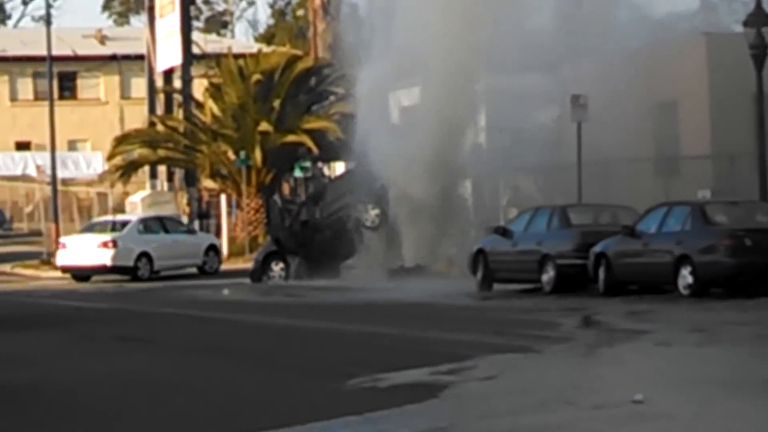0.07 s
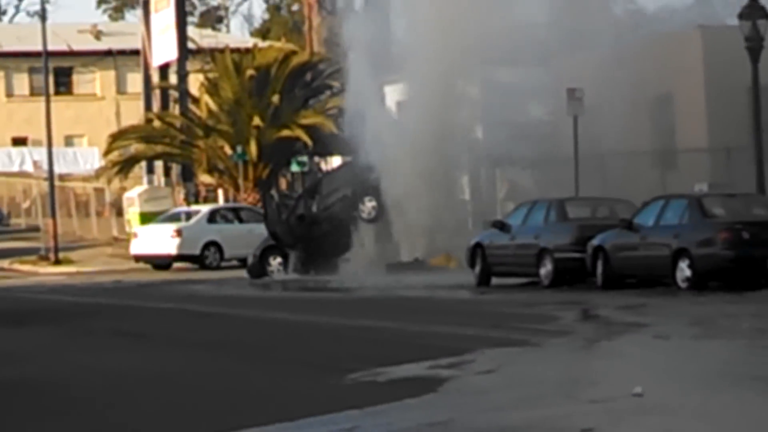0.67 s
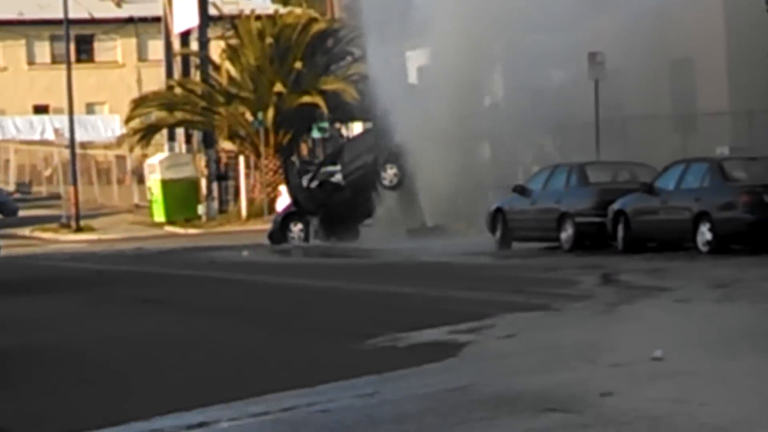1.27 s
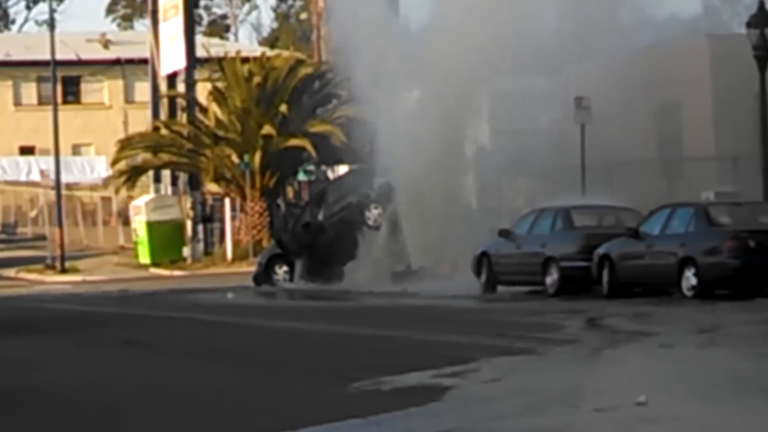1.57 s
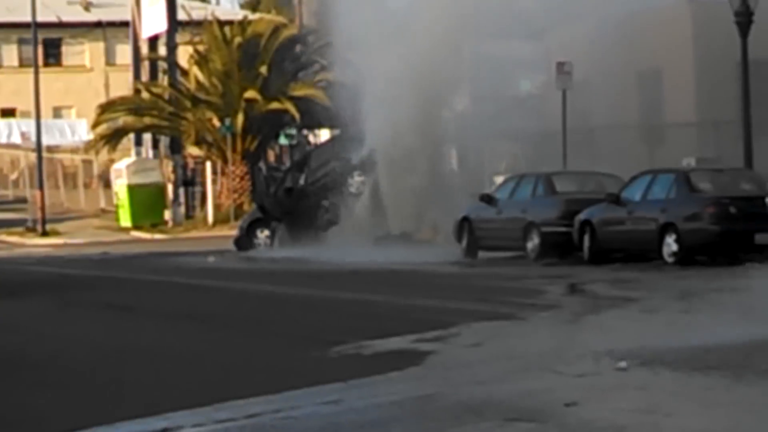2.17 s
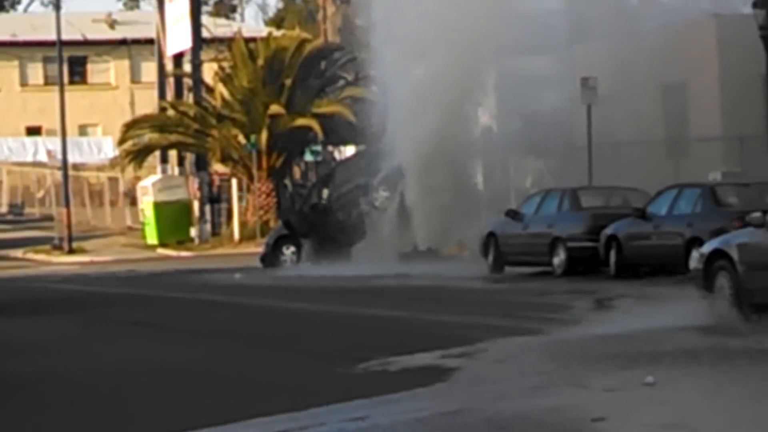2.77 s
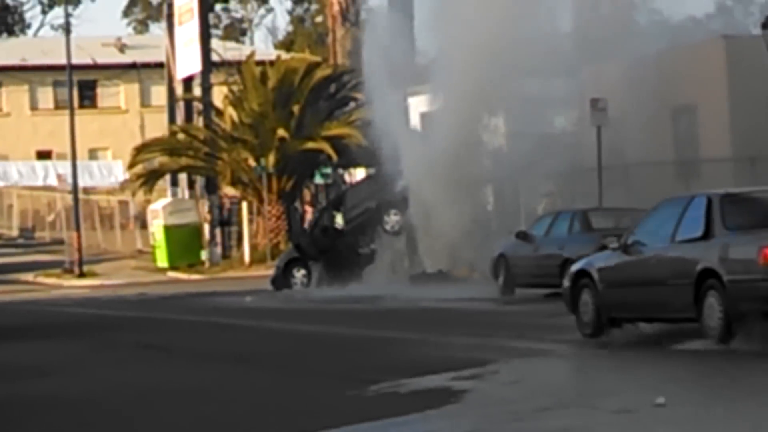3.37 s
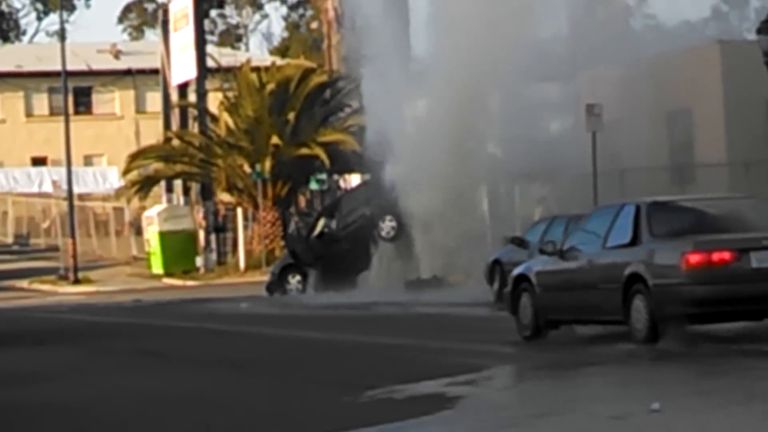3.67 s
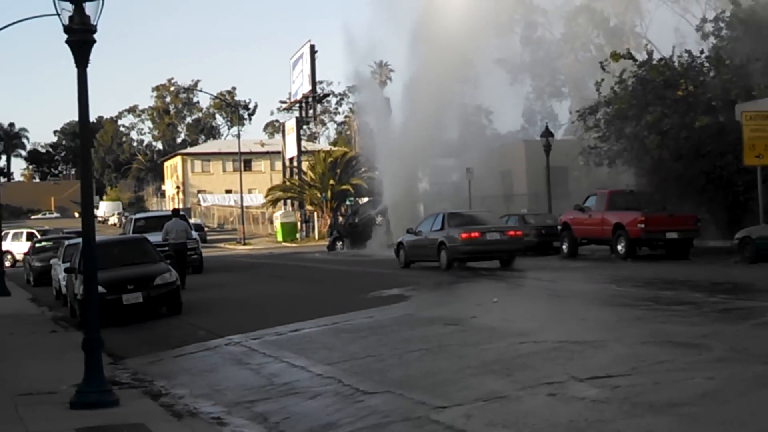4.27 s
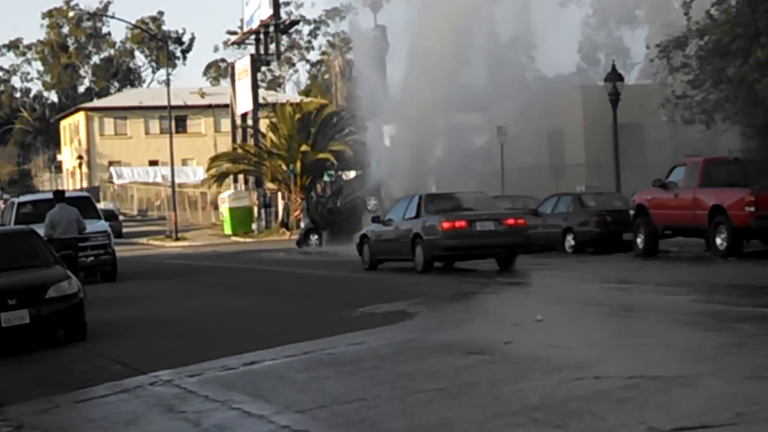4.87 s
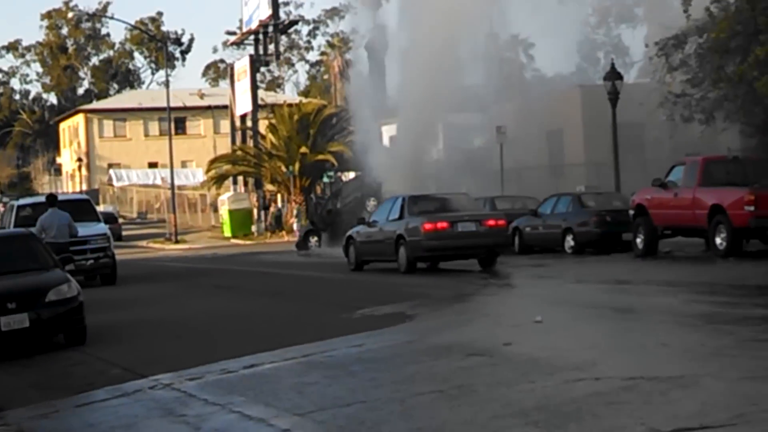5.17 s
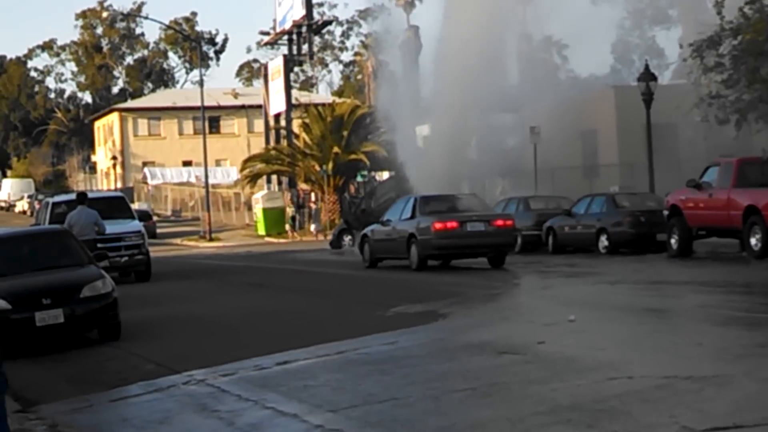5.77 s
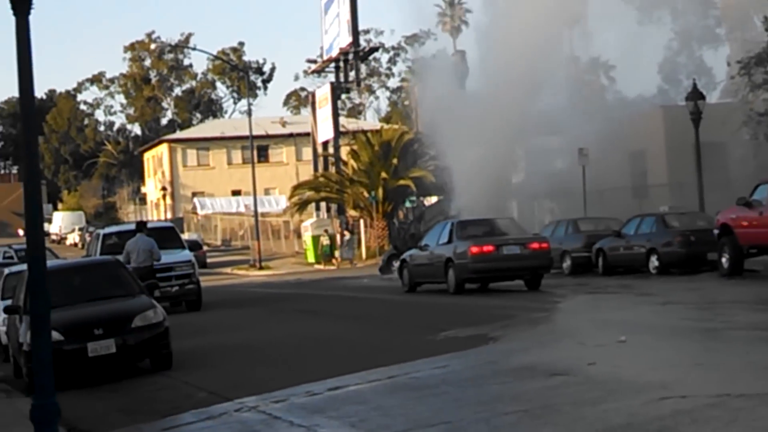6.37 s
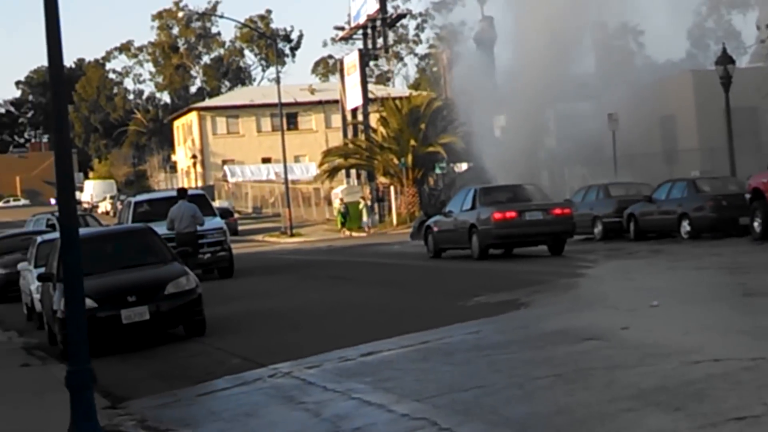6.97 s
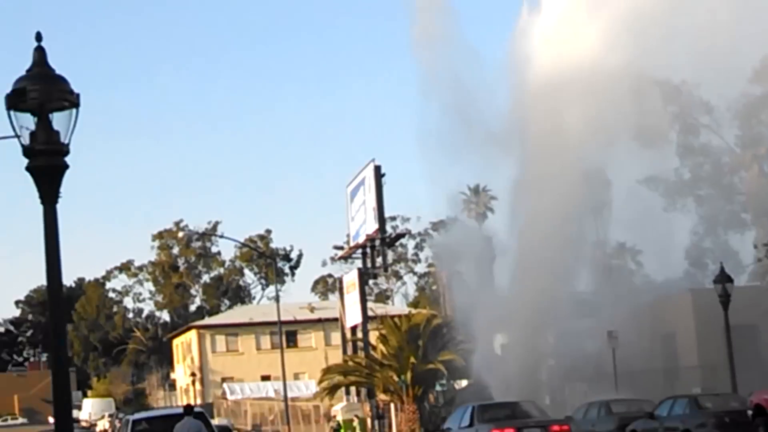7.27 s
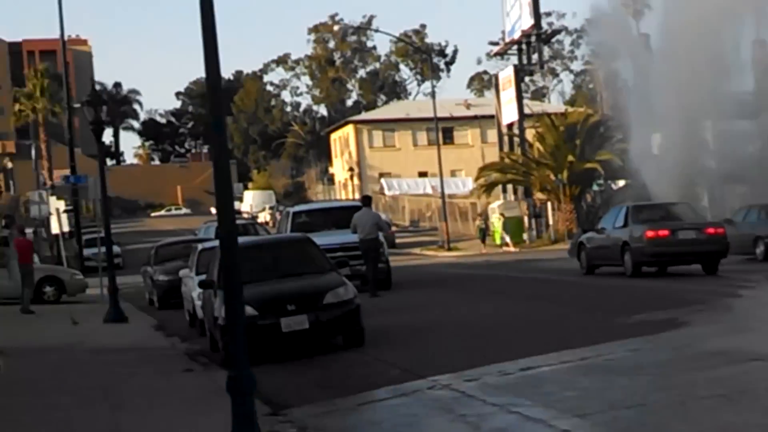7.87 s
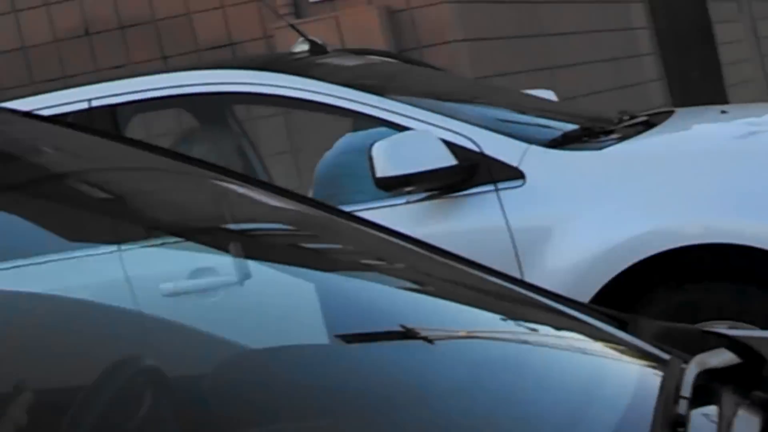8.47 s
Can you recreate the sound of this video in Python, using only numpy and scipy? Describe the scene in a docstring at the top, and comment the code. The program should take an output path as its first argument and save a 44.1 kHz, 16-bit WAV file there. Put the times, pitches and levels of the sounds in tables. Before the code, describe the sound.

A column of water from a sheared hydrant roars and hisses throughout, slapping the street with pattering drops and uneven low thuds. Early on, a car's low hum rises and its tyres swish over wet asphalt, then recede under the water. The hand-held stereo microphone, some way off, picks up soft wind thumps and, at the end, a few faint, high ticks from fingers on its case.

```python
"""A roar and a splashing hiss come from across a city street: a sheared hydrant throws up a tall column.
Countless eddies and impacts merge into noise as its water slaps the road; heavier masses boom and thud,
and single drops ring in the spray. A car rolls by, exhaust humming and tyres swishing on wet asphalt.
Air buffets the hand-held stereo microphone, whose case ticks faintly as it is swung round at the end."""
import sys
import numpy as np
from scipy import signal
from scipy.fft import rfft, irfft, next_fast_len
from scipy.io import wavfile
from scipy.ndimage import uniform_filter1d

SR = 44100
rng = np.random.default_rng(int(sys.argv[2]) if len(sys.argv) > 2 else 0)


def store_pcm(level_fs):
    """Save levels as 16-bit WAV."""
    pcm = np.round(np.clip(level_fs, -1, 1) * 32767).astype(np.int16)
    wavfile.write(sys.argv[1], SR, np.atleast_2d(pcm).T)


N = 384993

# Levels are relative, before each source's trim. A bell's spread is its standard deviation in time.
# the column's roar, and its upper edge near 500 Hz: t/s, level/dB
ROAR_LEVEL = [(0, -23), (0.4, -26), (0.8, -28), (1.4, -27), (2.4, -25.5), (3.1, -26), (4.2, -26),
              (4.8, -26.5), (5.3, -27), (6.2, -25), (7.5, -26.5), (7.9, -27), (8.35, -26), (8.73, -27.5)]
EDGE_LEVEL = [(0, -41.5), (1.2, -46), (3.2, -52), (3.9, -56), (5.2, -54), (6.7, -40), (7.6, -39.5),
              (8.73, -40.5)]
# water falling on the road, fine spray, air on the microphone: t/s, level/dB
SPLASH_LEVEL = [(0, -28), (2.1, -27), (3.4, -27), (4.4, -29), (5.05, -33.5), (5.8, -31.5), (6.3, -32.0),
                (6.7, -30), (7.4, -31), (7.9, -31.5), (8.73, -34)]
SPRAY_LEVEL = [(0, -33.5), (0.4, -33.5), (0.9, -34.5), (2.6, -35.5), (3.9, -34.5), (4.55, -35),
               (5.1, -37.5), (5.55, -36.5), (6, -35), (6.6, -36), (8.73, -36)]
BUFFET_LEVEL = [(0, -34), (0.7, -39), (1.5, -36.5), (2.2, -40.5), (3.8, -35.5), (4.5, -36.5), (5.4, -40),
                (6.2, -35.5), (7.4, -38), (7.9, -42), (8.3, -38), (8.73, -43)]
# spectral density of each noise: f/Hz, level/dB
ROAR_SPECTRUM = [(80, -39), (135, -8), (165, -2.5), (200, -2.5), (217, -5), (240, -1.5), (270, -1.5),
                 (292, -3.5), (325, 1.5), (365, -1), (388, -5.5), (403, -1.2), (426, 0.9), (460, -9.5),
                 (505, -10.5), (540, -21), (800, -39), (1600, -41)]
EDGE_SPECTRUM = [(420, -16), (470, 3), (520, -1.5), (560, -15), (620, -35)]
SPLASH_SPECTRUM = [(380, -45), (560, -0.5), (700, 3), (820, 2.5), (1080, -2.2), (1250, -1.3), (1420, -6.5),
                   (1620, -7.8), (2100, -12), (2500, -5.5), (3200, -60), (5000, -47)]
SPRAY_SPECTRUM = [(900, -28), (1800, 2), (2550, -0.5), (3150, 2.5), (4500, -1), (6200, -1.45), (7500, -1),
                  (8400, 3), (9500, -3.5), (10500, -9.8), (12000, -11.5), (13200, -7), (15500, -9.5)]
BUFFET_SPECTRUM = [(15, -42), (33, -30), (55, -11), (75, -8.5), (96, -3), (125, -5.5), (180, -31),
                   (400, -61)]
BOOM_SPECTRUM = [(295, -52), (322, -1.5), (342, 4.5), (360, 8), (373, -12), (395, -40)]
GUST_SPECTRUM = [(20, -41), (38, -17), (55, -13), (75, -5), (130, -3.5), (300, -38)]
TYRE_SPECTRUM = [(500, -28), (800, -2), (1150, 5), (1400, 1), (1750, 8.5), (2050, 8.5), (2400, 6),
                 (4000, -36), (8000, -17)]
THUD_SPECTRUM = [(110, -33), (155, 6.5), (210, -1), (260, 8), (310, -20), (400, -52)]
# stereo width of the falling water, narrowing as the microphone turns away: t/s, side gain/dB
WATER_WIDTH = [(0, -1.5), (5.3, -2), (6.5, 1), (7.9, -0.5), (8.25, -3), (8.73, -7)]
# echo off the road: t/s, lag/s, amplitude ratio
ROAD_REFLECTION = [(0, 0.0011, 0.48), (2.5, 0.0011, 0.55), (4.3, 0.0011, 0.45), (5.4, 0.0011, 0.36),
                   (6.2, 0.001, 0.38), (7.1, 0.00096, 0.3), (7.7, 0.00095, 0.5), (8.05, 0.0011, 0.33),
                   (8.73, 0.0015, 0)]
# brief dips in level: t/s, depth/dB, hold/s
LEVEL_DIPS = [(0.024, 2.5, 0.027), (0.537, 1, 0.28), (2.474, 0.5, .02), (2.804, 2, 0.03), (3.498, 2, .02),
              (4.06, 1.5, 0.098), (6.204, 1, 0.19), (6.9, 1.5, .01), (7.628, 3, 0.17), (8.015, 1.5, 0.019)]
# heavier masses of water (about three a second), gusts, slabs of water: t/s, spread/s, level/dB
SURGE_BELLS = [(0.23, 0.061, -3), (0.5, 0.062, -2), (1.05, 0.081, 0.5), (1.39, 0.068, -1.5),
               (1.72, 0.028, -4), (1.9, 0.048, -2), (2.12, 0.03, 0), (2.42, 0.037, -8), (2.74, 0.023, -2),
               (3.16, 0.059, -9), (3.47, 0.085, 0), (3.95, 0.035, -16), (4.44, 0.058, 1),
               (4.74, 0.054, 0.5), (4.89, 0.049, -2.5), (5.1, 0.031, -5), (5.32, 0.2, -5),
               (5.74, 0.047, -2.5), (6.11, 0.042, 2.5), (6.43, 0.024, 0.5), (6.69, 0.078, -8),
               (6.96, 0.088, -5), (7.18, 0.094, -5.5), (7.54, 0.065, 0), (8.39, 0.028, 0.5)]
GUST_BELLS = [(0.95, .04, -32), (1.1, 0.042, -34), (1.27, 0.04, -31), (1.7, 0.036, -27), (2.15, 0.05, -25),
              (2.815, 0.033, -20), (3.49, 0.049, -23), (3.81, .05, -27), (7.3, 0.05, -22), (7.7, .06, -25),
              (8.25, 0.063, -30), (8.67, 0.039, -33)]
THUD_BELLS = [(2.42, .05, 0), (2.58, 0.035, 1), (4.8, 0.042, 0), (5.33, .04, 1), (6.02, 0.038, -8),
              (6.28, 0.024, 0), (6.65, 0.054, 1), (7.05, 0.052, -8), (7.47, .035, -1), (8.42, .05, 0)]
# tyres cutting through puddles: t/s, rise/dB
PUDDLE_FLARES = [(2.28, 4), (2.71, 8), (3.42, 9), (4.48, 9)]
# the car's exhaust: t/s, firing rate/Hz, level/dB
ENGINE_FIRING = [(0, 100, -62), (1.5, 103, -43), (2.2, 106, -37.5), (3.0, 106, -46), (4.3, 108, -39),
                 (5.0, 102, -46), (5.6, 106, -43.5), (8.73, 108, -43)]
# fingers on the case: t/s, contact length/s, lower modes/dB, upper modes/dB, scuff/dB
FINGER_TOUCHES = [(7.62, 0.011, -38, -34, -29), (8.025, .010, -35, -40, -29), (8.17, .02, -64, -45, -62),
                  (8.279, .016, -45, -52, -58), (8.298, .02, -56, -36.5, -64), (8.358, .014, -58, -44, -62),
                  (8.516, .02, -39.5, -43, -56), (8.64, .016, -48, -38, -55)]
# modes of the case: f/Hz, level/dB, t60/s
CASE_RESONANCES = [(11400, -9, .025), (12340, -8, .018), (12500, 6, 0.036), (14780, 0, .055),
                   (15280, -6, .02)]
# the two microphone ports' difference (side) against their sum (mid): f/Hz, level/dB
SIDE_LEVEL = [(50, 18.5), (90, 6), (130, -1.5), (180, -1), (250, -9.5), (350, -16.5), (440, -7), (540, 7),
              (680, -1.5), (900, -12), (1250, -4.5), (1700, -1.5), (2200, -3), (2700, -1), (3300, 0.2)]
# likeness of side and mid: f/Hz, coherence (0-1)
SIDE_COHERENCE = [(50, 0.74), (180, 0.83), (270, 0.55), (350, 0.25), (440, 0.81), (550, 0.33), (680, 1),
                  (900, 0.54), (1250, 0.25), (1700, 0.63), (2250, 0.87), (3300, 0.2), (4700, 0.29),
                  (7500, 0.6), (9000, 1), (10400, .5), (11700, 0.37)]
# side against mid: f/Hz, phase/rad
SIDE_PHASE = [(50, -1.5), (100, -2), (320, -1.5), (400, -0.5), (510, 3), (600, -1.2), (900, -1), (1200, -2),
              (1600, 0), (2200, 1), (3300, -1), (4500, 0)]
# where the column lies as the microphone turns: t/s, left minus right/dB
COLUMN_BEARING = [(0, 0.1), (3, -0.1), (5.3, 0.5), (6.5, -0.9), (7.7, -1), (8.2, -3), (8.73, -6)]
# treble imbalance of the stereo widening: f/Hz, right minus left/dB
TREBLE_BALANCE = [(1200, 0.12), (2200, 0), (9000, 1.2), (13000, 0.34)]


def from_db(db):
    """Amplitude grows tenfold for every 20 dB."""
    return 10 ** (np.asarray(db) / 20)


def rms(x):
    """Effective amplitude: the root of the mean power."""
    return np.sqrt(np.mean(x ** 2) + 1e-20)


def in_time(rows):
    """Linear interpolation of each column of a curve at every sample."""
    s, *columns = np.transpose(rows)
    return [np.interp(np.arange(N) / SR, s, c) for c in columns]


def level(curve, trim_db=0):
    """Gains add in decibels: a curve at every sample, plus a trim."""
    return in_time(curve)[0] + trim_db


def bin_hz():
    """Frequencies of a Fourier transform a little longer than N."""
    return np.fft.rfftfreq(2 * next_fast_len(N // 2 + 1), 1 / SR)


def per_bin(points):
    """Linear interpolation of a table on a log-frequency axis."""
    hz, value = np.transpose(points)
    return np.interp(np.log(bin_hz() + 1e-9), np.log(hz), value)


def drift(corner_hz):
    """Low-pass filtering turns white noise into a smooth wander of rms 1."""
    hz = bin_hz()
    white = rfft(rng.standard_normal(2 * len(hz) - 2))
    slow = irfft(white / (1 + (hz / corner_hz) ** 2))[:N]
    return slow / rms(slow)


def bells(rows):
    """Gaussian pulses superpose into one amplitude envelope."""
    now = np.arange(0, N, 20) / SR
    gain = sum(from_db(db) * np.exp(-.5 * ((now - s) / spread) ** 2) for s, spread, db in rows)
    return np.interp(np.arange(N) / SR, now, gain)


def stereo(mid, side):
    """Left and right are the sum and difference of mid and side."""
    return np.array([mid + side, mid - side])


def port_noise(spectrum):
    """Partial coherence: the two ports share only part of a coloured noise. Their mean has rms 1."""
    shared, own = rfft(rng.standard_normal((2, 2 * len(bin_hz()) - 2))) * from_db(per_bin(spectrum))
    coherence = np.clip(per_bin(SIDE_COHERENCE), 0, 1)
    apart = coherence * np.exp(1j * per_bin(SIDE_PHASE)) * shared + np.sqrt(1 - coherence ** 2) * own
    mid = irfft(shared)[:N]
    side = irfft(apart * from_db(per_bin(SIDE_LEVEL)))[:N]
    return stereo(mid, side) / rms(mid)


def rush(level_db, spectrum, clump_db, clump_hz, width_db=0):
    """Incoherent addition: impacts and eddies merge into noise, which flutters as they clump."""
    left, right = from_db(level_db + clump_db * drift(clump_hz)) * port_noise(spectrum)
    return stereo((left + right) / 2, (left - right) / 2 * from_db(width_db))


def even_noise(spectrum):
    """Dividing by the running rms steadies a noise, so that its bursts alone shape it."""
    noise = port_noise(spectrum)
    power = uniform_filter1d(np.mean(noise ** 2, axis=0), size=SR // 12)
    return noise / np.sqrt(np.abs(power) + 0.097 * rms(noise) ** 2)


def column_roar(throb_db, surge, swell_db=1.5):
    """Turbulence in the column radiates low noise, which swells with each surge."""
    level_db = level(ROAR_LEVEL, trim_db=-0.9) + throb_db + swell_db * surge
    return rush(level_db, ROAR_SPECTRUM, clump_db=0.58, clump_hz=17)


def roar_edge():
    """Band-limited noise near 500 Hz tops the roar, fading and returning on its own."""
    return rush(level(EDGE_LEVEL, trim_db=1), EDGE_SPECTRUM, clump_db=2.4, clump_hz=8,
                width_db=level(WATER_WIDTH, trim_db=-18))


def road_splash(throb_db):
    """Impact noise: falling water slaps the road and fills the middle frequencies."""
    level_db = level(SPLASH_LEVEL, trim_db=-1.22) + throb_db
    return rush(level_db, SPLASH_SPECTRUM, clump_db=0.84, clump_hz=13, width_db=level(WATER_WIDTH))


def off_the_road(sound):
    """Interference with the road's reflection cuts notches, which shift as the microphone moves."""
    lag_s, strength = in_time(ROAD_REFLECTION)
    samples = np.arange(N)
    echo = np.array([np.interp(samples - lag_s * SR, samples, port) for port in sound])
    return (sound + strength * echo) / np.sqrt(1 + strength ** 2)


def spray_hiss(throb_db):
    """The tiny impacts of fine spray add incoherently to a broadband hiss."""
    level_db = level(SPRAY_LEVEL, trim_db=2.5) + throb_db
    return rush(level_db, SPRAY_SPECTRUM, clump_db=0.61, clump_hz=21)


def ring(force, hz, t60):
    """A damped oscillator: a unit impulse starts a decaying sine of height 1."""
    decay, step_rad = from_db(-60 / (t60 * SR)), 2 * np.pi * hz / SR
    poles = [1, -2 * decay * np.cos(step_rad), decay * decay]
    return signal.lfilter([0, np.sin(step_rad)], poles, force + 1e-18)


def near_drops(per_s=560, trim_db=-17.5, spread_db=8, cycles=8.8, pitches=16):
    """A Poisson process: nearer drops burst singly out of the spray, each ringing for a few cycles."""
    born = rng.random((2, N)) < per_s / SR
    sizes = from_db(spread_db * np.minimum(rng.exponential(1, (2, N)), 4))
    clicks = born * sizes * rng.choice([-1, 1], (2, N))
    pitch_index = rng.integers(0, pitches, (2, N))
    patter = sum(ring(clicks * (pitch_index == k), hz, cycles / hz)
                 for k, hz in enumerate(np.geomspace(3000, 10000, pitches)))
    return from_db(level(SPRAY_LEVEL, trim_db)) * patter / rms(patter)


def air_buffet():
    """Pressure fluctuations of air moving over the microphone make a low rumble."""
    return rush(level(BUFFET_LEVEL, trim_db=-2), BUFFET_SPECTRUM, clump_db=0.5, clump_hz=1.3)


def dip_gain(attack_s=0.014, release_s=0.23):
    """Amplitude modulation: the level drops quickly, holds and recovers more slowly."""
    now = np.arange(N) / SR
    depth_db = sum(np.interp(now, s + np.cumsum([0, attack_s, hold, release_s]), [0, db, db, 0])
                   for s, db, hold in LEVEL_DIPS)
    return from_db(-depth_db)


def surge_boom(surge, level_db=-28.3):
    """Narrow-band noise has a pitch: heavier masses of water come down with a hollow note."""
    return surge * from_db(level_db) * even_noise(BOOM_SPECTRUM)


def gusts(trim_db=-3.2):
    """Pressure pulses of air push the two ports in opposite directions with short, low thumps."""
    return from_db(trim_db) * bells(GUST_BELLS) * even_noise(GUST_SPECTRUM)


def tyre_swish(nearest_s=2.85, nearest_m=7.5, m_per_s=4, nearest_db=-39.5, db_per_decade=37):
    """Attenuation with distance shapes the swish of passing tyres, which flares in each puddle."""
    now = np.arange(N) / SR
    distance_m = np.hypot(m_per_s * (now - nearest_s), nearest_m)
    loss_db = db_per_decade * np.log10(distance_m / nearest_m)
    puddle_db = sum(db * np.exp(-.5 * ((now - s) / 0.043) ** 2) for s, db in PUDDLE_FLARES)
    return rush(nearest_db - loss_db + puddle_db, TYRE_SPECTRUM, clump_db=0.8, clump_hz=13)


def engine_hum(waver=0.056, throb_db=5.5, side_db=5.5):
    """Periodic firing gives the exhaust a note, uneven in pitch and level, out of phase at the ports."""
    firing_hz, level_db = in_time(ENGINE_FIRING)
    phase = 2 * np.pi * np.cumsum(firing_hz * (1 + waver * drift(11.9))) / SR
    note = stereo(np.sin(phase), -np.cos(phase) * from_db(side_db))
    return from_db(level_db + throb_db * drift(9.3)) * note


def slab_thuds(trim_db=-29):
    """The impact of a slab of water on the ground is a dull burst, lower than the boom."""
    return from_db(trim_db) * bells(THUD_BELLS) * even_noise(THUD_SPECTRUM)


def case_ticks(trim_db=10, right_db=-17, split_hz=13500, scuff_hz=11000):
    """Modal resonance: each touch is a bright scuff that rings the case's lower and upper modes."""
    ticks, age = np.zeros(N), np.arange(SR // 8) / SR
    high_pass = signal.butter(4, scuff_hz, "high", fs=SR, output="sos")
    for s, length, lower_db, upper_db, scuff_db in FINGER_TOUCHES:
        contact = (2 * age / length) * np.exp(1 - 2 * age / length)
        scuff = rng.standard_normal(len(age)) * contact
        tick = from_db(scuff_db) * signal.sosfilt(high_pass, scuff)
        for hz, mode_db, t60 in CASE_RESONANCES:
            tone = ring(scuff, hz, t60)
            touch_db = lower_db if hz < split_hz else upper_db
            tick += tone / np.abs(tone).max() * from_db(mode_db + touch_db)
        start = int(s * SR)
        ticks[start:start + len(age)] += tick[:N - start]
    return ticks * from_db(trim_db + np.array([[0], [right_db]]))


def comb(late, flatten=0.082):
    """Comb filtering: a sound plus its late copy has flattened humps and notches, at similar power."""
    gain = (1 + late) / np.sqrt(1 + np.abs(late) ** 2)
    return gain * np.sqrt((1 + flatten) / (1 + flatten * np.abs(gain) ** 2))


def scene():
    """Superposition: water, car, wind and handling add at the two ports."""
    throb_db = 0.31 * drift(corner_hz=19)   # the water throbs as the jet breaks up
    surge = bells(SURGE_BELLS)
    roar = column_roar(throb_db, surge)
    road = off_the_road(road_splash(throb_db) + tyre_swish())
    spray = spray_hiss(throb_db)
    wind = air_buffet() + gusts()
    street = roar + road + wind + near_drops() + engine_hum()
    street += roar_edge() + surge_boom(surge) + slab_thuds()
    dip = dip_gain()
    return street * dip + spray * dip ** 1.3 + case_ticks()   # the hiss dips 1.3 times as many dB


def record(dry):
    """Delayed crossfeed widens the stereo image, which shifts with bearing; then the top is cut."""
    lag_samples, cutoff_hz = 16, 15500
    hz = bin_hz()
    pan = from_db(level(COLUMN_BEARING) * np.array([[.5], [-.5]]))
    left, right = rfft(dry * pan, 2 * len(hz) - 2)
    crossfeed = per_bin([(400, 0), (1500, 1)])   # sets in at 400 Hz, complete from 1500 Hz
    late = crossfeed * np.exp(-2j * np.pi * hz * lag_samples / SR)
    # subtracting each channel's late copy from the other interleaves the notches of mid and side
    mid = (left + right) / 2 * comb(-late)
    side = (left - right) / 2 * comb(late)
    balance = from_db(per_bin(TREBLE_BALANCE) * np.array([[-.5], [.5]]))
    low_pass = np.clip((cutoff_hz - hz) / 100 + .5, 0, 1)
    return irfft(stereo(mid, side) * balance * low_pass)[:, :N]


dry = scene()
out = record(dry)
store_pcm(out)
```